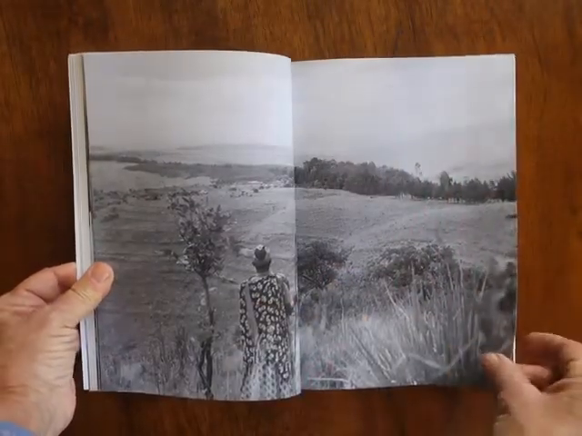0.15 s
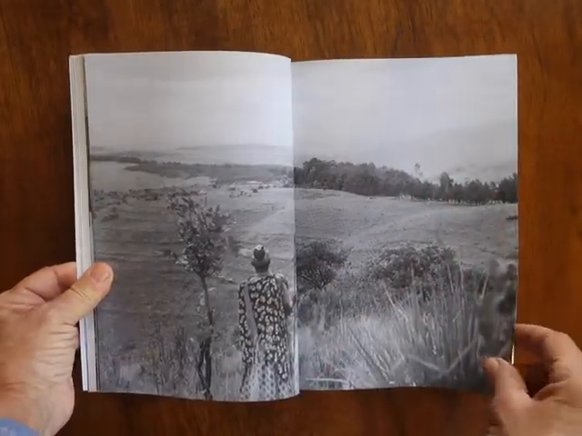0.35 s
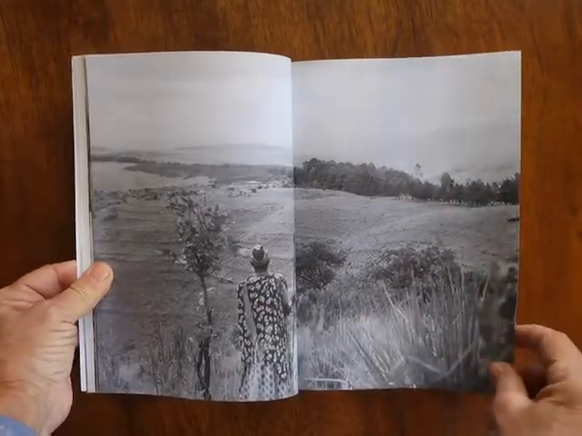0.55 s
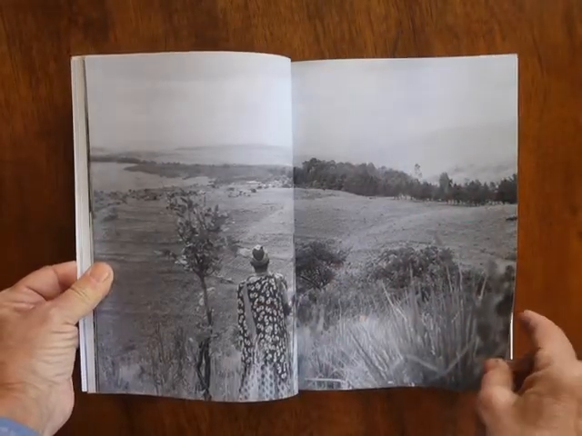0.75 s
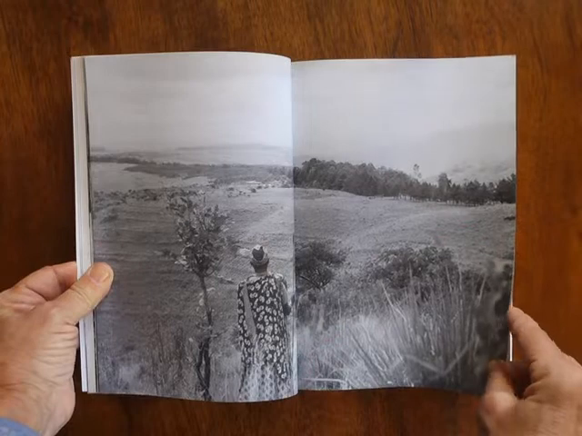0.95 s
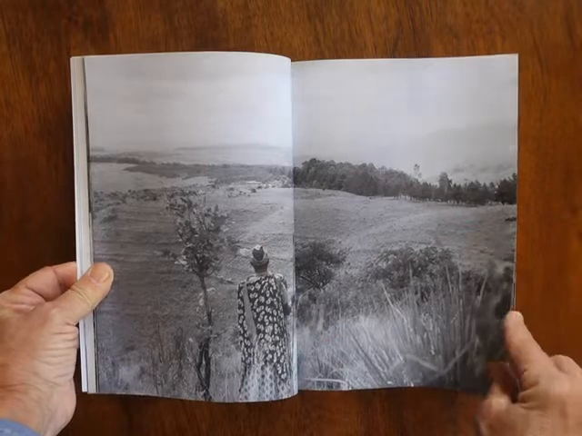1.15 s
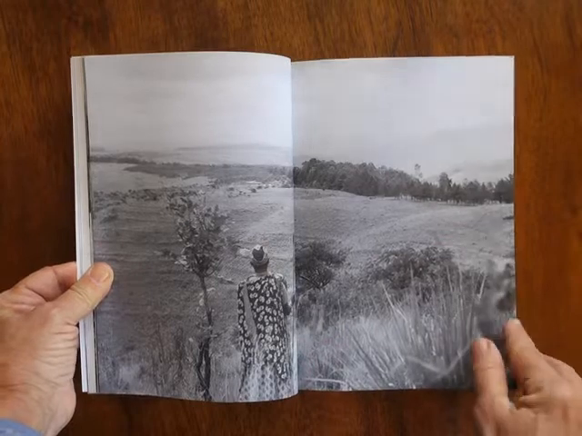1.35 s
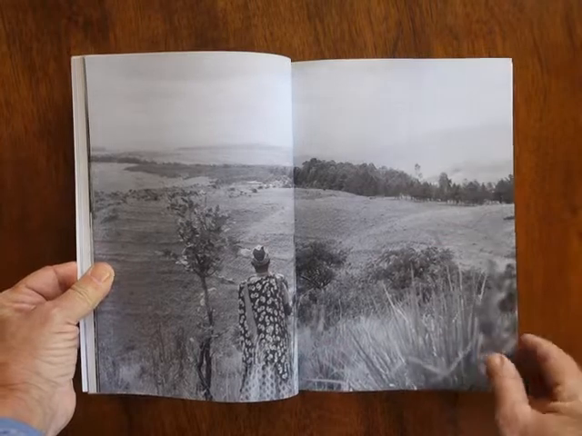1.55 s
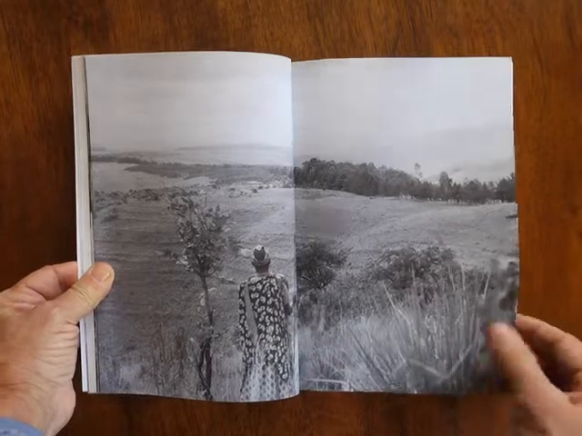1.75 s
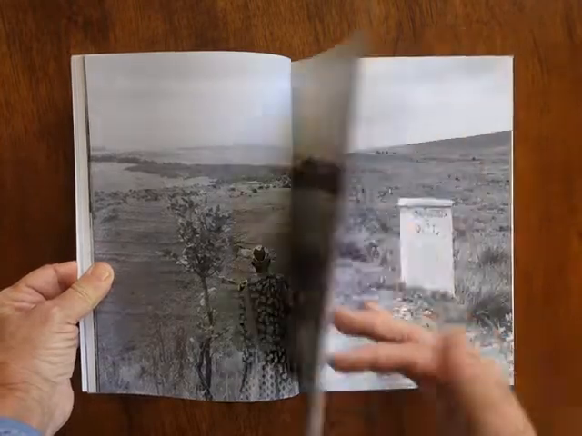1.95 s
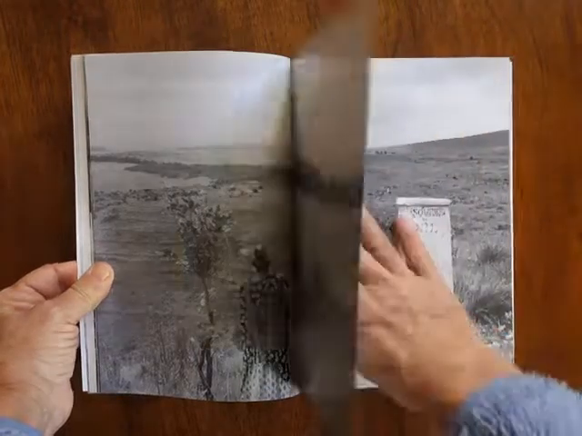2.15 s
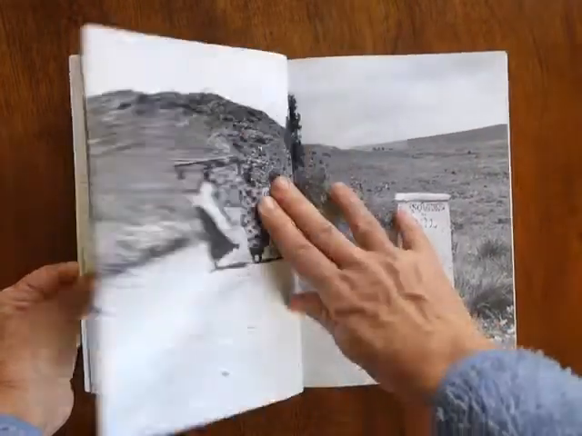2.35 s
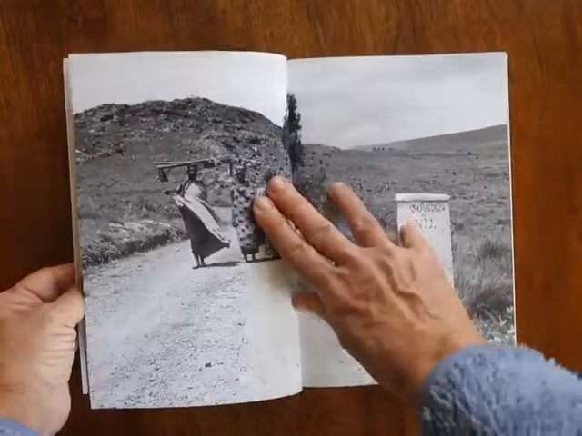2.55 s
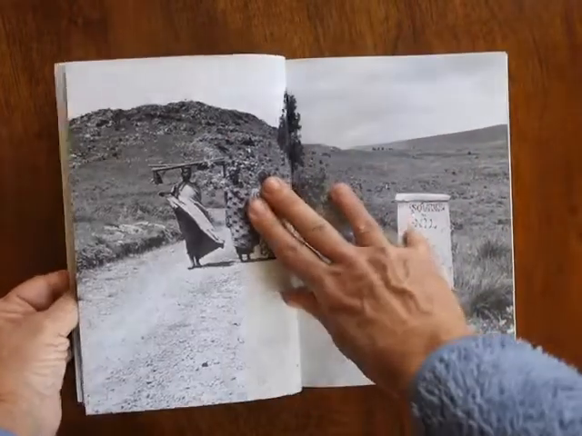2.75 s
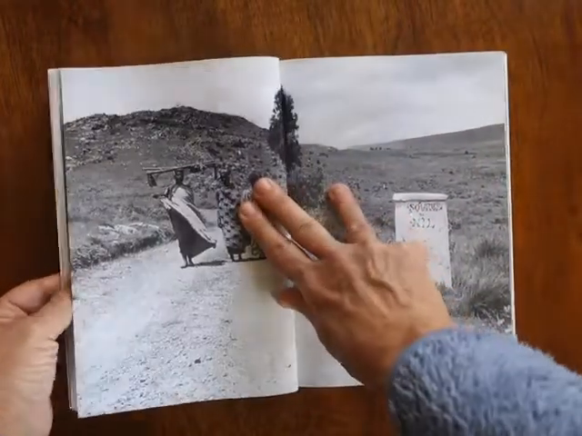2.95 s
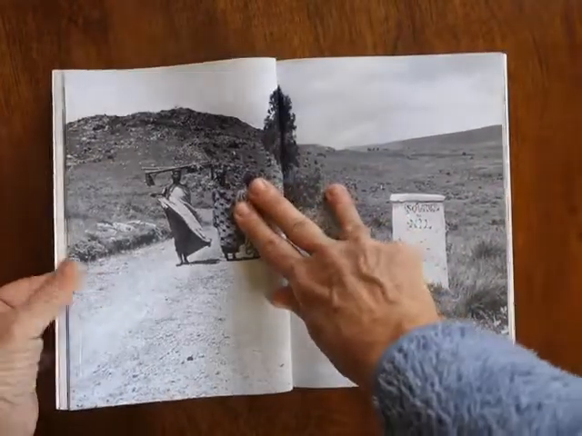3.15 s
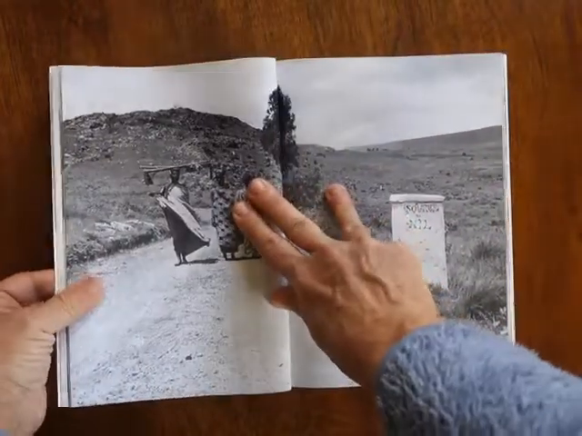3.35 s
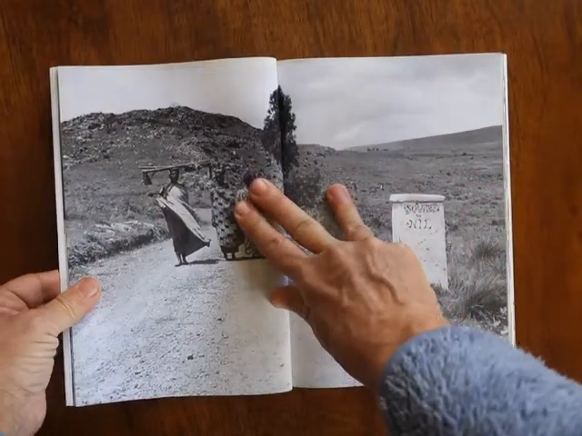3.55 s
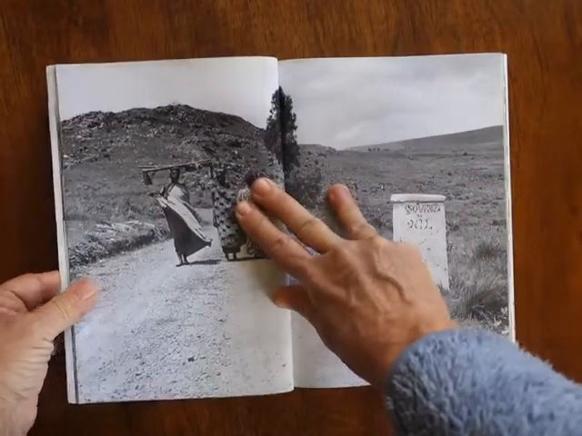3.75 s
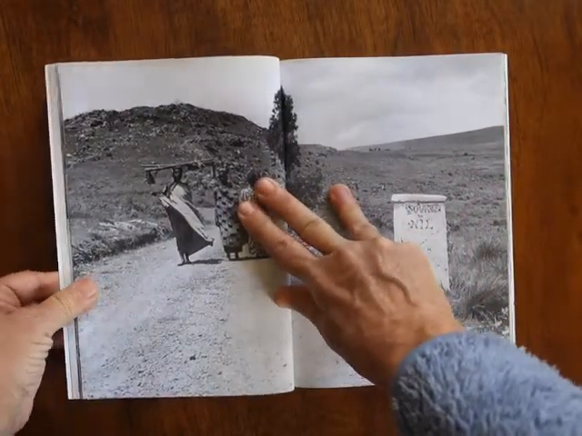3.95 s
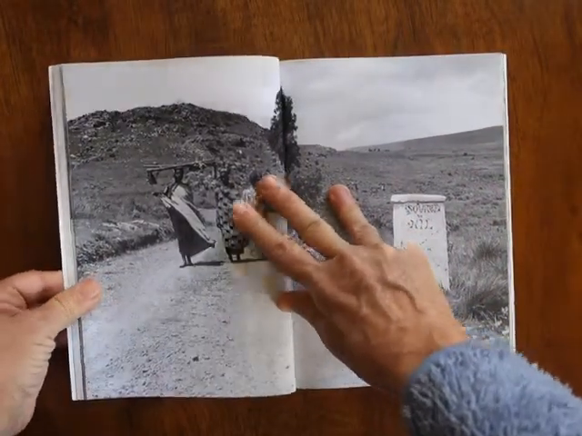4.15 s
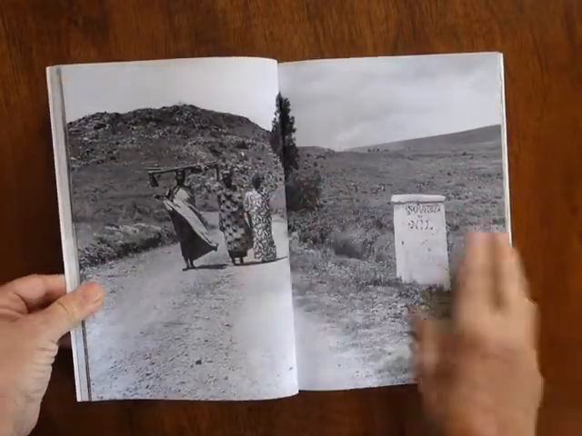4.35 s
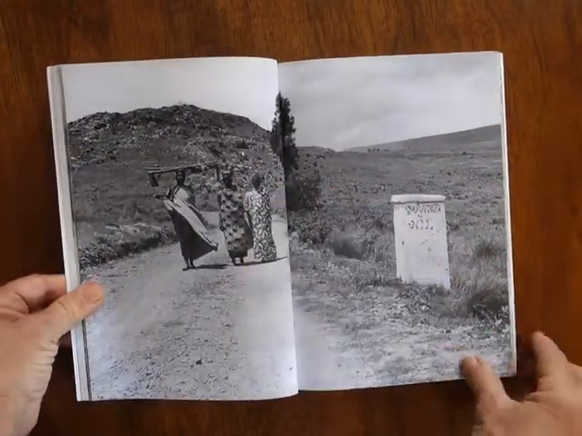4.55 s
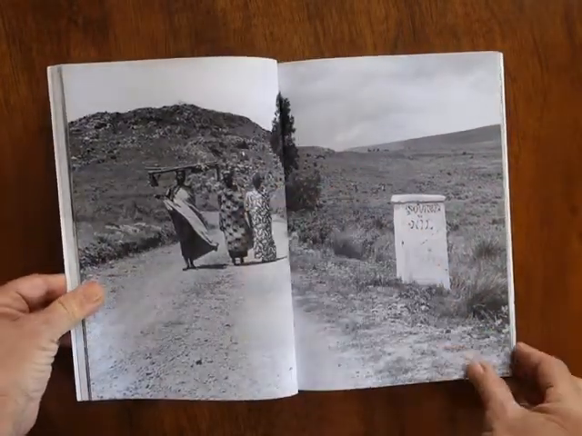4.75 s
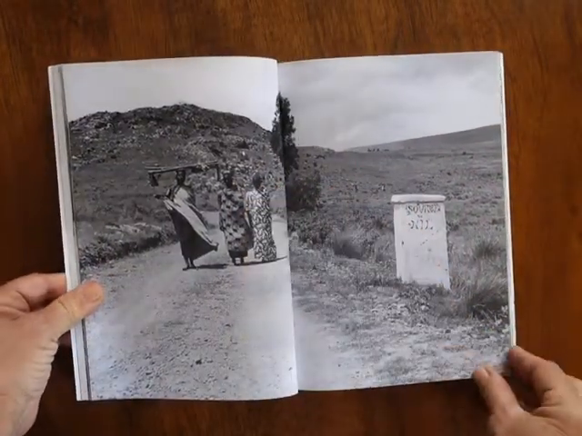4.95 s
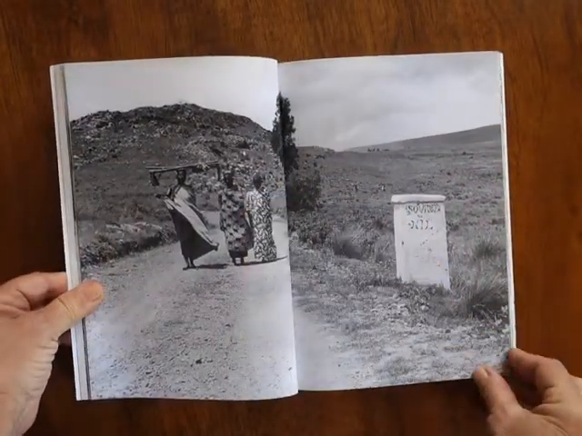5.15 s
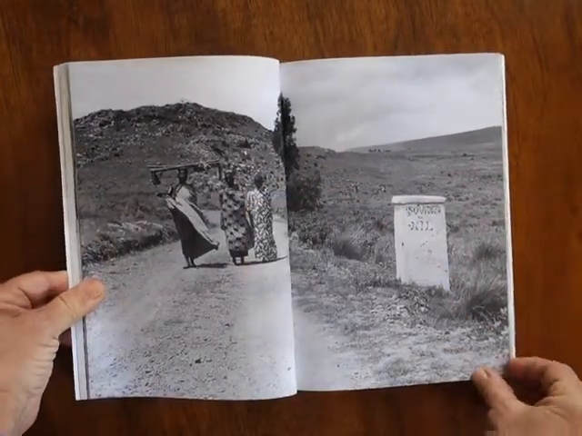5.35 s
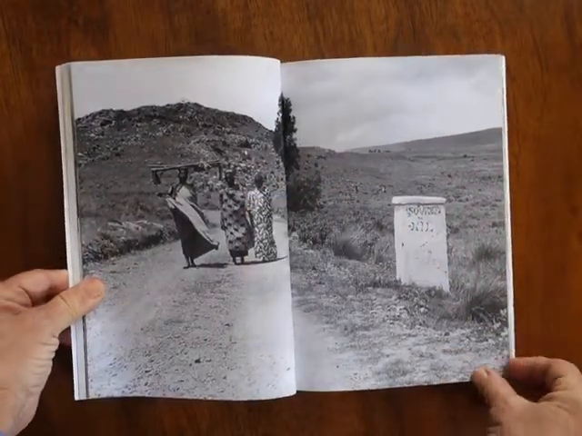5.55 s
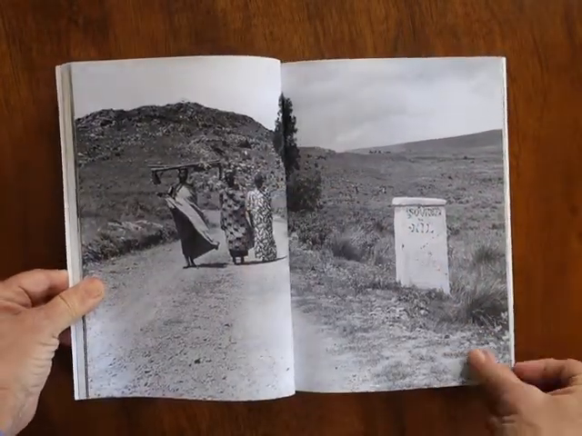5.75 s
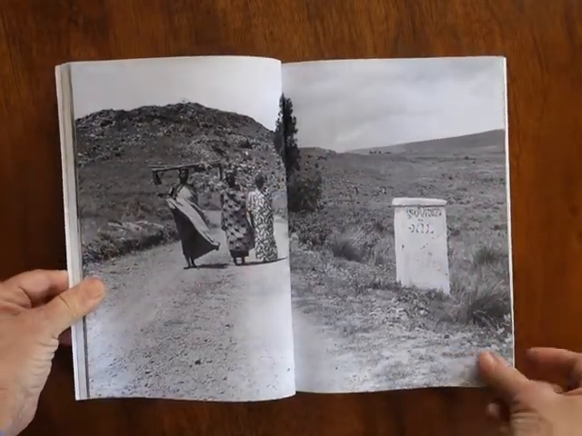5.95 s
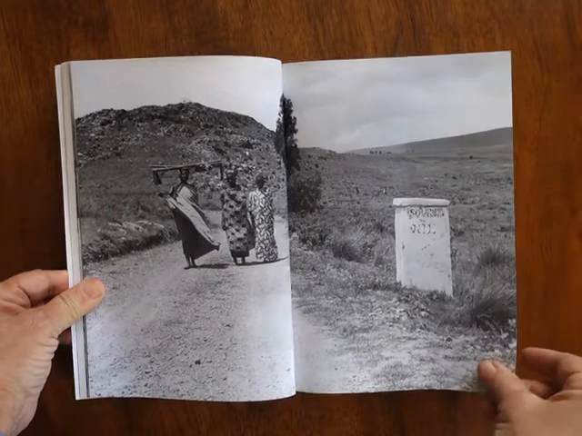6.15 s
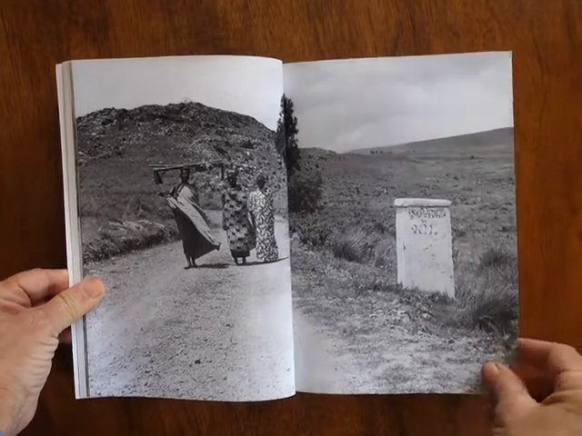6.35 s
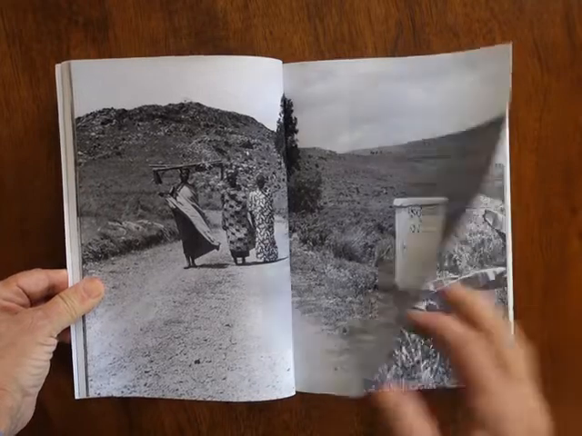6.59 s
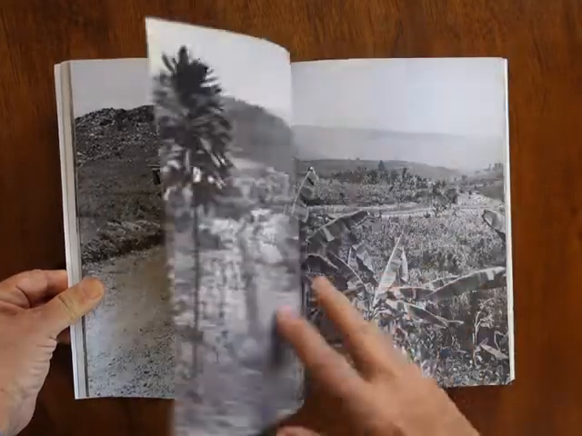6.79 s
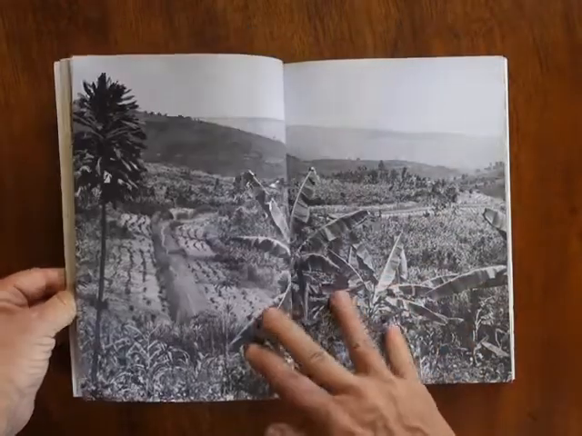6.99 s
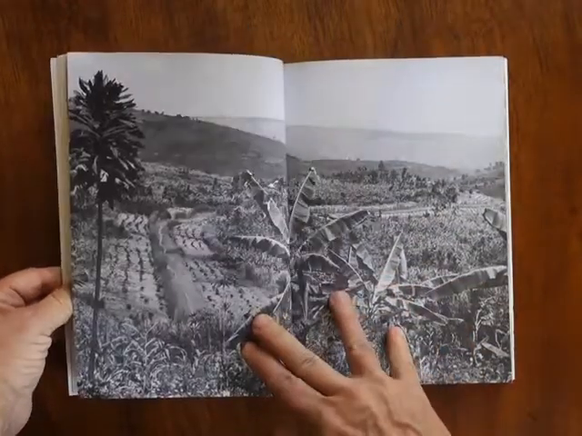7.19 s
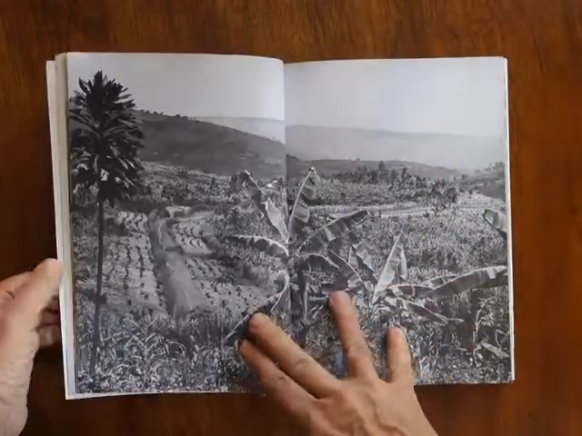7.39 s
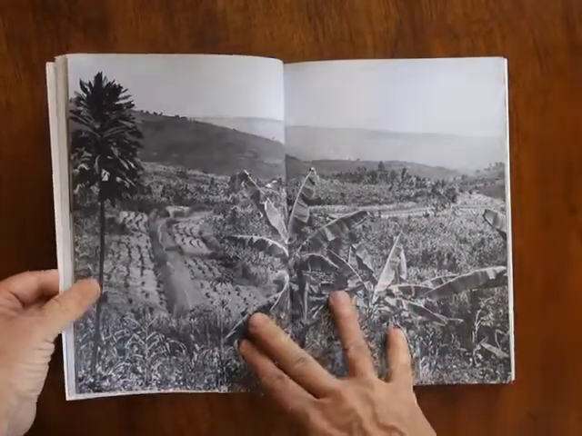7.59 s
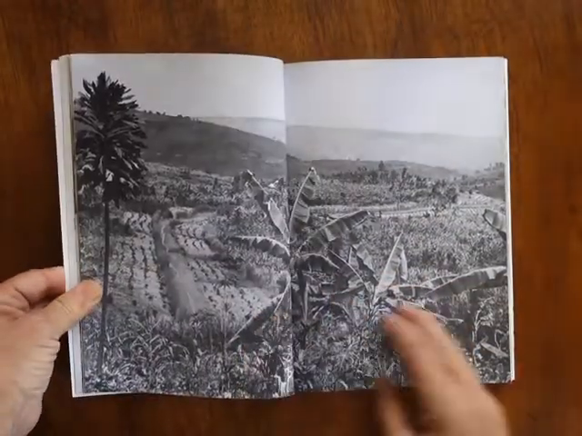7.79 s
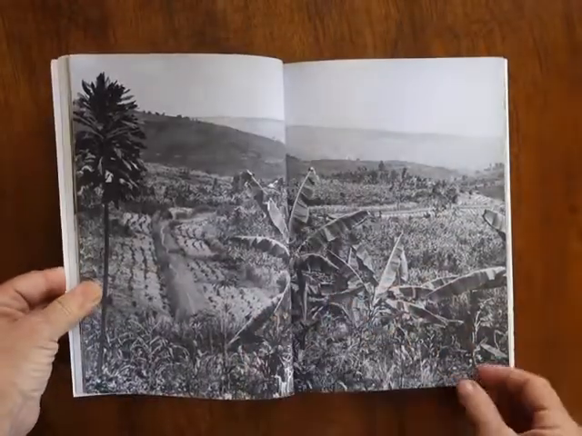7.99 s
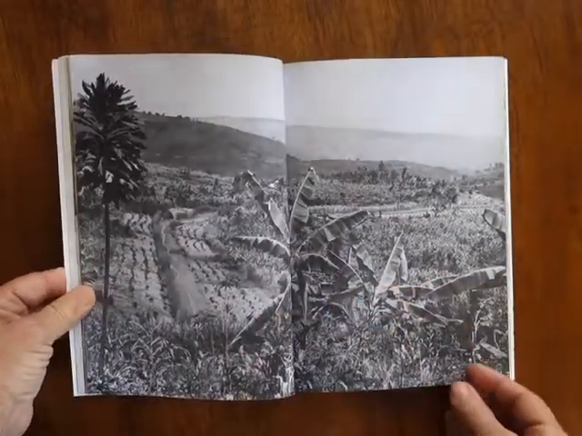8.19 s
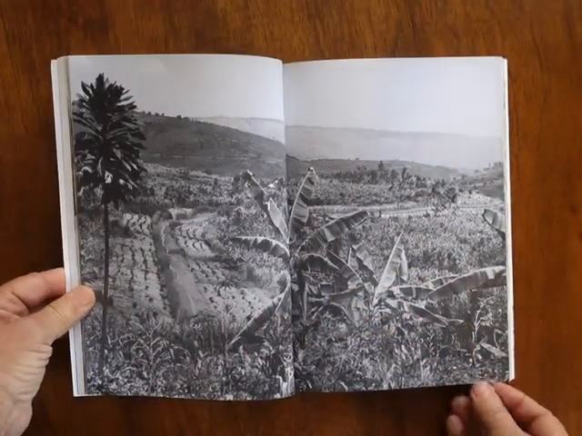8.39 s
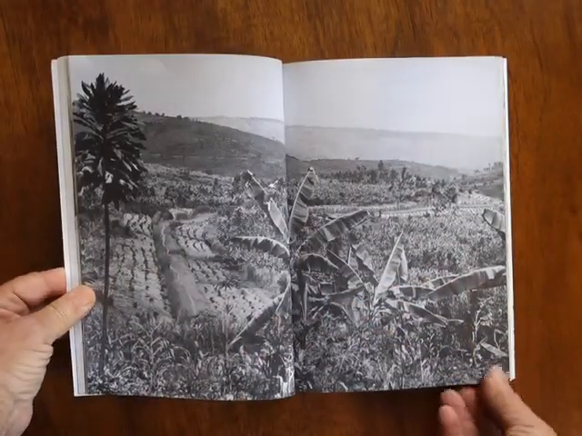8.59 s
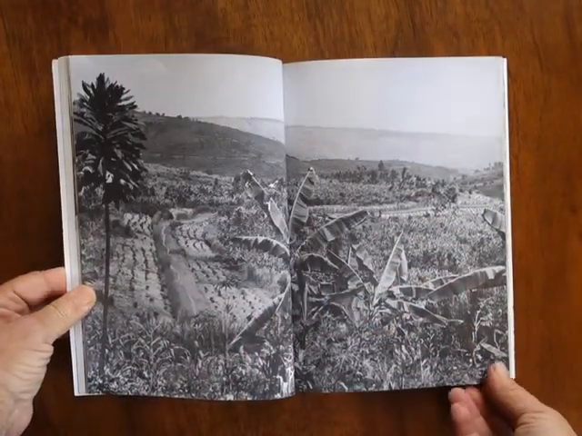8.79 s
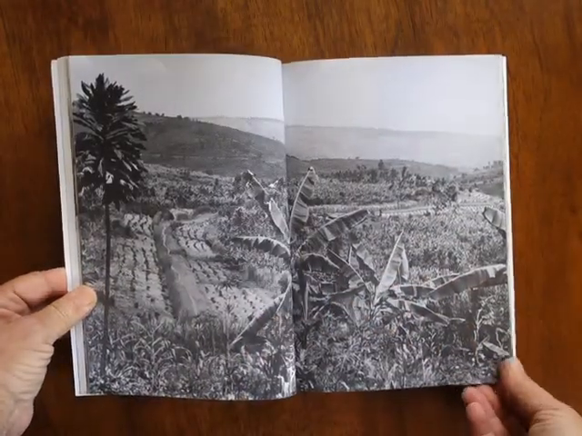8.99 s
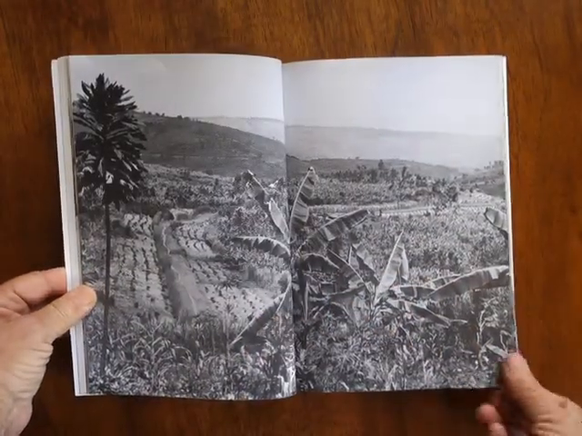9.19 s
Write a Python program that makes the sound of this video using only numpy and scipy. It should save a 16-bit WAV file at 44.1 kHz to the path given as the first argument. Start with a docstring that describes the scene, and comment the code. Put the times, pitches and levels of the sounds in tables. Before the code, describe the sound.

Close, dry paper handling on a wooden table: small ticks and scrapes, two page turns, a sharp buckle under the palm, faint room air.

```python
"""The pages of a softcover book scuff, snap and buckle on a wooden table, close under a stereo microphone.
Fingers pick at the page corner, two leaves are swept over and land, and the hands press the spread flat.
Flicks and pops are short fading tones; scrapes, rubs and sweeps are noise shaped by pressure or speed.
The table echoes the flicks and hums under pushes; a quiet room rings near 800 Hz over faint steady air."""
import sys
import numpy as np
from scipy import signal
from scipy.fft import rfft, irfft, next_fast_len
from scipy.io import wavfile
from scipy.ndimage import uniform_filter1d, map_coordinates

SR = 44100
rng = np.random.default_rng(int(sys.argv[2]) if len(sys.argv) > 2 else 0)


def unload_audio(sound):
    """Save the sound as a 16-bit wav file, at the path given as the first command line argument."""
    columns = np.transpose(np.atleast_2d(sound))
    # keep every value between -1 and 1, then stretch to whole-number steps
    steps = np.round(np.clip(columns, -1, 1) * 32767)
    wavfile.write(sys.argv[1], SR, steps.astype(np.int16))


N = 407043  # length of the scene [samples]

# the loose leaf flaps over and lands; levels are relative:
# (time [s], flutter level [dB], slap level [dB], time to fade by 60 dB [s], pitch [Hz])
FLAPS = [(1.968, -52.5, -50, 0.2, 785), (2.04, -52.5, -60, 0.58, 796), (2.172, -35.5, -60, 0.21, 776),
         (2.216, -43, -56, 0.36, 776), (2.284, -38, -43, 0.3, 1414), (2.386, -35, -35.5, 0.24, 761),
         (6.51, -44.5, -50, 0.22, 990), (6.625, -37.5, -60, 0.13, 768), (6.89, -44, -44.5, 0.19, 1070),
         (6.992, -44.5, -66, 0.14, 854)]


def amp(db):
    """Turns decibels into a gain."""
    return 10 ** (np.asarray(db) / 20)


def unit(x):
    """Scales a sound to an average strength (rms) of 1."""
    return x / np.sqrt(np.mean(x ** 2) + 1e-20)


def along(points, hz):
    """Reads a curve of (frequency [Hz], value) points, spaced by pitch."""
    frequencies, values = np.transpose(points)
    return np.interp(np.log(hz + 1), np.log(frequencies), values)


def wobble(rate, size):
    """A smooth random curve with `rate` random points a second."""
    points = rng.standard_normal(int(size * rate / SR) + 4)
    return map_coordinates(points, [np.arange(size) * rate / SR])


def filtered(x, response):
    """Changes the strength or timing of each frequency by a response function."""
    size = x.shape[-1]
    padded = next_fast_len(size + 4096)
    spectrum = rfft(x, padded) * response(np.fft.rfftfreq(padded, 1 / SR))
    return irfft(spectrum, padded)[..., :size]


def coloured(x, spectrum):
    """Shapes noise by (frequency [Hz], level [dB]) points and scales it to rms 1."""
    return unit(filtered(x, lambda hz: amp(along(spectrum, hz))))


def band(x, centre_hz, octaves, steep):
    """Keeps a flat-topped band of frequencies and scales it to rms 1."""
    distance = lambda hz: np.abs(np.log2((hz + 1) / centre_hz) / octaves)
    return unit(filtered(x, lambda hz: 1 / (1 + distance(hz) ** steep)))


def spread(pair, alike):
    """Mixes two unrelated noises so left and right are more or less alike at each frequency."""
    turn = lambda hz: np.arccos(np.clip(along(alike, hz), -1, 1)) / 2
    mid, side = filtered(pair, lambda hz: np.array([np.cos(turn(hz)), np.sin(turn(hz))]))
    return np.array([mid + side, mid - side])


def placed(pan_db):
    """Left and right gains with a mean of 1; pan_db is how much louder the left is."""
    gains = amp([[pan_db / 2], [-pan_db / 2]])
    return gains / gains.mean()


def add(track, s, sound):
    """Mixes a sound into a track from time s [s]."""
    start = round(s * SR)
    part = sound[..., max(-start, 0):N - start]
    first = max(start, 0)
    track[:, first:first + part.shape[-1]] += part


def friction(size, grain_db, width):
    """Fibres catch and slip: stereo noise in tiny clumps of random strength."""
    mid, side = rng.standard_normal((2, size)) * amp(grain_db * wobble(1500, size))
    return np.array([mid + width * side, mid - width * side])


def stroke(length, rise_share):
    """A swell of pressure or speed: its curve, and how long before the peak it starts [s]."""
    rise = length * np.clip(rise_share, .05, .95)
    fall = length - rise
    t = np.arange(-3 * rise, 3 * fall, 1 / SR)
    return np.exp(-(t / np.where(t < 0, rise, fall)) ** 2), -t[0]


def thin(x, corner_hz):
    """A free sheet radiates little bass, because air slips round its edges."""
    return filtered(x, lambda hz: (1j * hz / (corner_hz + 1j * hz)) ** 3)


def patchy(x, depth_db):
    """A bending sheet shifts its resonances: energy gathers in patches wandering over pitch and time."""
    grid = signal.stft(x, nperseg=512)[2]
    field = uniform_filter1d(rng.standard_normal(grid.shape[1:]), size=4, axis=0)  # blur over pitch
    field = uniform_filter1d(field, size=9, axis=1)  # blur over time
    shaped = grid * amp(depth_db * unit(field))
    power = lambda frames: np.sum(np.abs(frames) ** 2, axis=(0, 1)) + 1e-24
    level_match = np.sqrt(power(grid) / power(shaped))  # each moment keeps its loudness
    return signal.istft(shaped * level_match, nperseg=512)[1][:, :N]


def air():
    """Steady room air and microphone hiss, made of shaped stereo noise."""
    # colour of the air: (frequency [Hz], relative level [dB])
    air_colour = [(20, -36), (60, -32), (120, -17), (200, -15), (330, -4.5), (550, -6.5), (820, 8.5),
                  (1020, -1.5), (1300, 4), (2000, -3), (3200, -6.5), (4500, -4.5), (8000, -8.5),
                  (11000, -10)]
    # left-right likeness of the air: (frequency [Hz], likeness [1 = the same])
    air_alike = [(60, 0.45), (170, 0.8), (500, 0.53), (1420, 0.24), (4090, 0.05), (11800, 0.035)]
    noise = spread(rng.standard_normal((2, N)), air_alike)
    return amp(-64.0) * placed(-4.5) * coloured(noise, air_colour)


def room(x, wet_db, modes_db, across):
    """A diffuse tail, a little stronger on the side of the source, plus a few standing tones."""
    # fading of the tail: (frequency [Hz], time to fade by 60 dB [s])
    tail_fade = [(100, 0.72), (280, 1), (700, 0.69), (1800, 0.67), (5000, 0.74), (11000, 0.58)]
    # colour of the tail: (frequency [Hz], relative level [dB])
    tail_colour = [(40, -9), (150, -2), (280, -1.5), (560, -3.5), (810, 1.5), (1100, -2.5), (2000, -0.5),
                   (4000, -7), (10000, -4.5)]
    # left-right likeness of the tail: (frequency [Hz], likeness [1 = the same])
    tail_alike = [(200, 0.97), (800, 0.87), (2000, 0.45), (5000, 0.12), (10000, 0.1)]
    # standing tones of table and room: (pitch [Hz], relative level [dB], time to fade by 60 dB [s])
    standing_tones = [(228, -59.5, 1.0), (289, -54.5, 0.84), (434, -65, 0.98), (843, -65.5, 0.82),
                      (957, -52, 0.28), (1143, -60, 1)]
    hz, frames, grid = signal.stft(rng.standard_normal((2, SR)), SR, nperseg=256)
    fade = amp(-60 * frames / along(tail_fade, hz)[:, None])
    tail = signal.istft(grid * fade, SR, nperseg=256)[1]
    t = np.arange(tail.shape[1]) / SR
    tail = filtered(spread(tail, tail_alike), lambda f: amp(along(tail_colour, f)))
    tail = tail * (1 - np.exp(-t / 0.00087))  # quick build-up
    tones = sum(amp(db - 60 * t / t60) * np.sin(2 * np.pi * f * t) for f, db, t60 in standing_tones)
    answer = amp(wet_db) * tail + amp(modes_db) * tones
    source = (1 - across) * x + across * x[::-1]  # some of each side reaches the other
    return signal.fftconvolve(source, answer, axes=1)[:, :N]


def table_echo(x, delay, echo_db):
    """The table top sends back a duller copy a moment later."""
    late = lambda hz: np.exp(-2j * np.pi * hz * delay)
    return filtered(x, lambda hz: amp(echo_db) * late(hz) / (1 + (hz / 6000) ** 2))


def leans():
    """A hand leans on the book: the table top's lowest tone swells and fades under each push."""
    # pushes: (time [s], level [dB])
    pushes = [(2.419, -64.5), (2.931, -76), (3.321, -72.5), (4.141, -65.5), (7.70, -82)]
    out, t = np.zeros((2, N)), np.arange(SR) / SR
    for s, db in pushes:
        hum = np.sin(2 * np.pi * 123 * t + 0.47 * wobble(18, len(t)))
        add(out, s, amp(db - 60 * t / 1.03) * (1 - np.exp(-t / 0.02)) * hum)
    return out


def rubs():
    """Soft, dull friction of the palms through the block of pages; a harder push sounds broader."""
    # palms push and rub on book and table:
    # (time of peak [s], length [s], relative level [dB], centre [Hz])
    palm_rubs = [(0.039, .09, -65, 377), (1.8, 0.21, -71, 360), (2.189, .1, -44, 560),
                 (2.42, 0.075, -44, 480), (2.758, 0.11, -53.5, 453), (2.941, 0.036, -40, 515),
                 (3.328, 0.1, -55, 457), (3.658, 0.062, -49.5, 565), (4.158, 0.096, -53, 393),
                 (4.4, 0.21, -67.5, 348), (4.639, 0.051, -64, 670), (4.798, 0.076, -64.5, 480),
                 (5.386, 0.36, -70.5, 360), (6.658, .114, -58, 537), (6.919, .16, -58.5, 470),
                 (7.372, 0.14, -63.5, 750), (7.718, 0.052, -56.5, 310), (7.751, 0.32, -64, 700),
                 (8.077, 0.14, -64, 280), (8.13, 0.34, -64, 800)]
    rise_share = 0.25  # share of a rub spent pressing in
    # half width [octaves] at the usual level [dB], and the extra level that doubles it [dB]
    usual_octaves, usual_db, widens_db = 0.6, -55, 24.5
    out = np.zeros((2, N))
    for s, length, db, hz in palm_rubs:
        pressure, lead = stroke(length, rise_share)
        octaves = usual_octaves * 2 ** ((db - usual_db) / widens_db)
        dull = band(friction(len(pressure), grain_db=3.5, width=0.13), hz, octaves, steep=2.48)
        add(out, s - lead, amp(db - 2) * placed(-1) * pressure * dull)
    return out


def touches(db_column):
    """Moments and strengths of the restless fingers, unevenly spaced."""
    # faint scrapes (column 0) and ticking flicks (column 1):
    # (start [s], end [s], typical scrape level [dB], typical flick level [dB])
    fidgets = [(.02, .25, -59.5, -39.5), (0.998, 1.75, -59.5, -41), (3.401, 4.3, -67.5, -46),
               (7.301, 8.297, -63.5, -53)]
    rate = 8.6  # touches a second
    rows = []
    for start, end, *levels in fidgets:
        late, force = rng.standard_normal((2, 32))
        times = np.arange(start, end, 1 / rate)
        for s, delay, strength in zip(times, late, force):
            rows.append((abs(s + 0.22 * delay / rate), levels[db_column] + 2.8 * strength))
    return rows


def scuffs():
    """Short scrapes: the speed of the slips sets a sharp upper edge, and the fibres add fizz above it."""
    # skin and page edges scrape over paper:
    # (time of peak [s], length [s], level [dB], upper edge [Hz], relative fizz level [dB])
    scrapes = [(.113, 0.019, -48.5, 3940, -15), (.153, .013, -47.5, 4500, -26),
               (.185, 0.018, -41, 4600, -21), (.203, 0.015, -42.5, 5700, -6),
               (.273, .028, -38.5, 4400, -21), (.308, 0.026, -40.5, 4440, -24),
               (.387, 0.0082, -34.5, 4500, -15.5), (.435, 0.015, -40.5, 4400, -13),
               (.546, 0.013, -51, 4440, -16), (.626, 0.038, -52.5, 4740, -2.5),
               (.67, 0.013, -47, 3250, -15), (.989, 0.022, -48, 4170, -5), (1.173, 0.032, -53, 5300, -4.5),
               (1.361, 0.018, -43, 6000, -2.5), (1.39, 0.15, -61, 5900, -8),
               (1.496, 0.059, -54.5, 6040, -20), (1.543, 0.036, -50.5, 6500, -6.5),
               (1.788, 0.075, -51, 5540, -9), (1.843, 0.058, -51.5, 5000, -15),
               (2.601, 0.11, -54.5, 4700, -6.5), (3.071, .042, -54.5, 4340, -7),
               (3.435, 0.13, -62, 3860, -22.5), (3.84, 0.075, -58, 3300, -24), (4.37, 0.23, -62, 6030, 4.5),
               (4.414, .016, -58.5, 6700, 12), (5.315, 0.069, -63.5, 5800, -5.5),
               (5.912, 0.033, -67, 6100, 0), (6.098, 0.025, -44, 6060, 1), (6.133, 0.014, -45, 4940, -17),
               (6.211, 0.017, -44.5, 4740, -14), (6.238, .017, -43, 5030, -9),
               (6.273, 0.013, -44, 5100, -9), (6.3225, .01, -40.5, 5200, -13),
               (6.3745, 0.007, -40.5, 4960, -10), (6.47, 0.04, -45, 5600, -3),
               (6.56, .022, -43.5, 4600, -12), (6.625, 0.041, -44, 3840, -8), (7.002, 0.052, -50, 4800, -1),
               (7.37, 0.077, -61, 5150, -2.5), (7.795, 0.17, -62, 7000, -0.5),
               (7.858, .042, -51.5, 7400, -6), (7.972, .039, -59, 6030, -4), (8.2, .2, -62.5, 6100, -7),
               (8.48, 0.017, -60, 6000, -10)]
    # colour of the scrape: (frequency [share of the upper edge], relative level [dB])
    rasp_colour = [(.06, -57), (.13, -15.5), (.22, -3), (.45, 3), (0.921, 3.5), (1.1, -9), (1.299, -24),
                   (2.5, -44)]
    # colour of the fizz: (frequency [Hz], relative level [dB])
    fizz_colour = [(3500, -26), (5600, -6.5), (7000, -3), (8000, -2), (9400, -2), (11000, -8.5)]
    # the working hand moves between page corner and spine: (time [s], left over right [dB])
    hand_path = [(.4, -16), (1.5, -11.5), (2.6, -7.5), (5.3, -9), (6.1, -9), (6.6, -16), (7, -2.5),
                 (8, -9.5)]
    rise_share = .43  # share of a scrape spent pressing in
    out = np.zeros((2, N))
    faint = [(s, .03, db, 4900, -10) for s, db in touches(db_column=0)]
    for s, length, db, edge_hz, fizz_db in list(scrapes) + faint:
        pressure, lead = stroke(length, rise_share)
        grains = friction(len(pressure), grain_db=3, width=0.42)
        rasp = coloured(grains, np.array(rasp_colour) * [edge_hz, 1])
        fizz = amp(fizz_db - 1.5) * coloured(grains, fizz_colour)
        pan = placed(np.interp(s, *np.transpose(hand_path)))
        add(out, s - lead, amp(db) * pan * pressure * (rasp + fizz))
    return patchy(out, depth_db=4.5)


def swish(s, db, start_hz, end_hz, glide):
    """The page corner slips off the fingertip: a narrow hiss that falls as the free edge gets longer."""
    pressure, _ = stroke(length=0.035, rise_share=0.2)
    t = np.arange(len(pressure)) / SR
    peak_time = t[np.argmax(pressure)]
    pitch = end_hz + (start_hz - end_hz) / (1 + np.exp((t - peak_time) / glide))
    blur = filtered(rng.standard_normal(len(t)), lambda hz: 1 / (1 + (hz / 700) ** 2))
    hiss = unit(blur * np.sin(2 * np.pi * np.cumsum(pitch) / SR))
    out = np.zeros((2, N))
    add(out, s, amp(db) * placed(-17) * pressure * hiss)
    return out


def riffles():
    """Leaf edges run off the thumb one after another, each softer than the last."""
    # (time [s], first level [dB], loss a leaf [dB], gap [s], pitch [Hz], relative tick level [dB])
    runs = [(3.6436, -21, 4, 0.016, 2600, -10.5), (8.074, -34.5, 1, .0335, 1260, -7)]
    rows = []
    for s, db, loss_db, gap, hz, tick_db in runs:
        for k in range(5):  # leaves in a run
            rows.append((s + k * gap, db - k * loss_db, hz, tick_db))
    return rows


def buckles():
    """A whole sheet jumps and rings low, sagging in pitch as tension goes, while the fold crackles."""
    # a bowed sheet pops into a new shape under the palm:
    # (time [s], level [dB], settled pitch [Hz], time to fade by 60 dB [s], relative overtone level [dB])
    pops = [(2.9298, -10, 783, 0.027, -33), (2.9365, -13.5, 950, 0.019, -17), (2.945, -23, 802, 0.065, -20),
            (3.826, -39.5, 898, 0.037, -23), (4.134, -32.5, 719, 0.045, -30),
            (4.1405, -23, 847, 0.024, -6.5), (7.70, -36.5, 746, 0.038, -20),
            (8.041, -43.5, 820, 0.047, -12)]
    # overtones: (multiple of the pitch, relative level [dB])
    overtones = [(1.62, -3), (2.0, -2)]
    attack = 0.0013  # rise of a pop [s]
    out, t = np.zeros((2, N)), np.arange(SR // 5) / SR
    # flaps and riffled leaves ring the sheet too; a flap's tone lasts 0.22 of its flutter
    flapped = [(s, db + 6, hz, 0.22 * t60, -12) for s, db, _, t60, hz in FLAPS]
    riffled = [(s, db - 18, 824, 0.067, -18) for s, db, _, _ in riffles()]
    for s, db, hz, t60, overtones_db in list(pops) + flapped + riffled:
        pitch = hz * (1 + 0.032 * np.exp(-t / 0.0041))
        slack = .6 * wobble(170, len(t)) * (1 - np.exp(-t / .006))
        phase = 2 * np.pi * np.cumsum(pitch) / SR + slack
        tone = np.sin(phase)
        for ratio, level in overtones:
            tone = tone + amp(overtones_db + level) * np.sin(ratio * phase)
        crackle = band(friction(len(t), grain_db=12.0, width=.25), hz, octaves=1.1, steep=3.1)
        life = (1 - np.exp(-t / attack)) * amp(-60 * t / t60)
        add(out, s, amp(db) * placed(-2.5) * life * (tone + amp(-12.5) * crackle))
    return thin(out, corner_hz=130)


def turns():
    """A travelling leaf slides along the hand in small jerks; flaps make it flutter and slap, then fade."""
    # the leaf slides along the hand and its neighbour:
    # (time of peak [s], length [s], relative slide level [dB], relative hiss level [dB])
    sweeps = [(2.024, 0.069, -47, -50.5), (2.228, 0.32, -49.5, -42), (6.58, 0.26, -47.5, -53),
              (6.935, 0.28, -49.5, -51)]
    # colour of each noise: (frequency [Hz], relative level [dB])
    flutter_colour = [(150, -29), (450, -6), (780, 4.5), (1300, -1), (2200, -8), (5000, -54)]
    slide_colour = [(500, -49), (1200, 2), (2000, 0.5), (4300, 5), (6000, -14.5), (11000, -35)]
    hiss_colour = [(2000, -36), (4500, 4), (5800, 5), (9000, 2.5), (11000, -3.5)]
    rise_share, flap_attack = 0.6, 0.0012  # share of a sweep spent gathering speed; rise of a flap [s]
    drive, t = np.zeros((3, N)), np.arange(SR // 2) / SR  # power of flutter, slide and hiss
    for s, length, slide_db, hiss_db in sweeps:
        speed, lead = stroke(length, rise_share)
        add(drive[1:], s - lead, (amp([[slide_db], [hiss_db]]) * speed) ** 2)
    for s, flutter_db, slap_db, t60, _ in FLAPS:
        life = (1 - np.exp(-t / flap_attack)) * amp(-60 * t / t60)
        add(drive[:2], s, (amp([[flutter_db], [slap_db]]) * life) ** 2)  # a slap uses the slide noise
    fluttering, sliding, hissing = np.sqrt(drive)
    jerks = amp(2.4 * wobble(90.6, N))
    flutter = coloured(friction(N, grain_db=4.5, width=0.22), flutter_colour)
    slide = coloured(friction(N, grain_db=2.0, width=0.51), slide_colour)
    hiss = coloured(friction(N, grain_db=2.5, width=0.59), hiss_colour)
    leaf = fluttering * amp(-1.5) * placed(-2) * flutter
    leaf = leaf + sliding * amp(-3.5) * placed(-10.5) * slide
    leaf = leaf + hissing * amp(-3.0) * placed(-6.5) * hiss
    return thin(jerks * leaf, corner_hz=120)


def snaps():
    """Each flick rings the sheet for a few cycles, with a bright tick and a dull push on the book."""
    # creases and page edges flick:
    # (time [s], level [dB], pitch [Hz], time to fade by 60 dB [s], thump relative to the flick [dB])
    creases = [(.1524, -24.5, 1920, 0.0027, -34), (.307, -28.5, 2220, 0.013, -39),
               (.3866, -22, 2070, .003, -42), (.4296, -20.5, 1300, 0.0032, -42.5),
               (.6663, -27, 2060, .0053, -38), (.7894, -17.5, 1490, 0.0023, -46.5),
               (1.1889, -29.5, 1030, 0.0053, -31), (1.329, -32.5, 4060, 0.0022, -28),
               (1.3618, -27.5, 4120, 0.00049, -28.5), (1.969, -34, 2880, 0.0024, -38),
               (2.0915, -28, 3930, 0.0023, -36), (2.3882, -18, 990, 0.0048, -26.5),
               (3.1975, -46.5, 4300, 0.0063, -31), (3.6195, -17, 2420, 0.0045, -35),
               (6.2124, -30, 2550, 0.013, -52), (6.3189, -28, 2065, 0.018, -43),
               (6.372, -30, 2300, 0.009, -34), (6.4822, -29, 3050, 0.0015, -26),
               (6.6184, -26, 2470, .0074, -43), (6.6439, -24, 2400, 0.0045, -28),
               (6.893, -21, 1310, 0.0045, -28), (6.9941, -31, 1860, 0.0071, -33),
               (7.7017, -31, 776, 0.006, -30), (8.0385, -20.5, 2290, 0.00055, -38.5)]
    # colour of the push on the book: (frequency [Hz], relative level [dB])
    thump_colour = [(30, -25), (80, -15), (130, -18.5), (300, 3), (600, 2.5), (1500, -2), (5000, -84)]
    # tick of a full-scale flick at the typical edge pitch [dB]; its dB per dB of force;
    # stiff, higher-pitched edges tick more [dB per octave]
    tick_full_db, tick_follows, tick_db_per_octave = -32, 0.5, 3.5
    edge_hz, light_thump_db = 1700, -31.5  # typical edge pitch; thump of a light touch or single leaf
    out, t = np.zeros((2, N)), np.arange(SR // 10) / SR
    light = [(s, db, edge_hz, .002, light_thump_db) for s, db in touches(db_column=1)]
    flicks = []
    for s, db, hz, t60, thump_db in list(creases) + light:
        stiffness_db = tick_db_per_octave * np.log2(hz / edge_hz)
        flicks.append((s, db, hz, t60, thump_db, tick_full_db + tick_follows * db + stiffness_db))
    leaves = [(s, db, hz, .0035, light_thump_db, db + tick_db) for s, db, hz, tick_db in riffles()]
    for s, db, hz, t60, thump_db, tick_db in leaves + flicks:
        slack = .9 * wobble(hz / 4, len(t)) * (1 - np.exp(-t / .002))  # limp paper cannot hold a pitch
        ring = np.sin(2 * np.pi * hz * t + slack) * amp(-60 * t / t60)
        ring = thin(ring, corner_hz=0.32 * hz)
        tick = band(rng.standard_normal(len(t)), 6430, octaves=0.63, steep=7.6)
        tick = tick * amp(-60 * t / 0.0027)
        crumple = band(friction(len(t), grain_db=3.5, width=0.74), hz, octaves=1.62, steep=6.2)
        crumple = thin(crumple, corner_hz=456) * amp(-60 * t / 0.03)
        thump = coloured(rng.standard_normal(len(t)), thump_colour) * amp(-60 * t / 0.14)
        body = amp(db) * (1.074 * ring + amp(-17) * crumple + amp(thump_db) * thump)
        add(out, s, placed(-4) * (body + amp(tick_db) * tick))
    return out


def scene():
    """Adds up paper and hands, the table's echo and hum, the room and its air."""
    flicks = snaps()
    corner_slip = swish(s=6.068, db=-35.5, start_hz=6080, end_hz=3700, glide=0.0046)
    scrapes = thin(scuffs() + corner_slip, corner_hz=230)
    echo = table_echo(flicks, delay=.0031, echo_db=-17.0)
    paper = flicks + echo + scrapes + rubs() + patchy(turns(), depth_db=3.5)
    pops = buckles()
    # the open spread beams its pops at the microphone, so the room gets a little less of them
    reverb = room(paper + amp(-1.5) * pops, wet_db=-35.0, modes_db=-5.5, across=0.15)
    return paper + pops + reverb + leans() + air()


def record(dry):
    """The recorder cuts off very steeply above its band limit."""
    top_hz = 11180
    return filtered(dry, lambda hz: 1 / np.sqrt(1 + (hz / top_hz) ** 300))


dry = scene()
out = record(dry)
unload_audio(out)
```